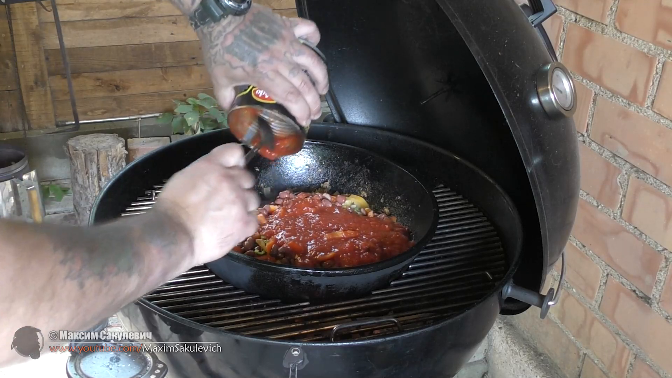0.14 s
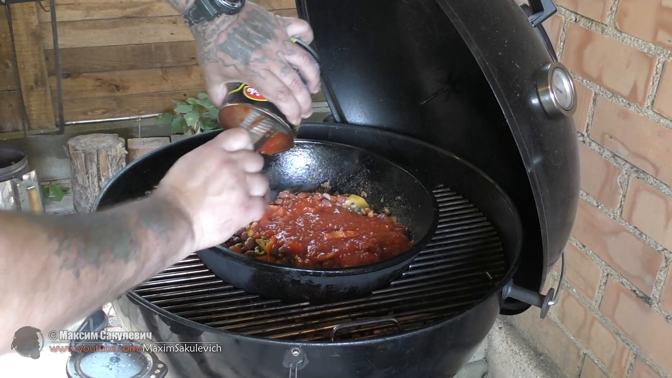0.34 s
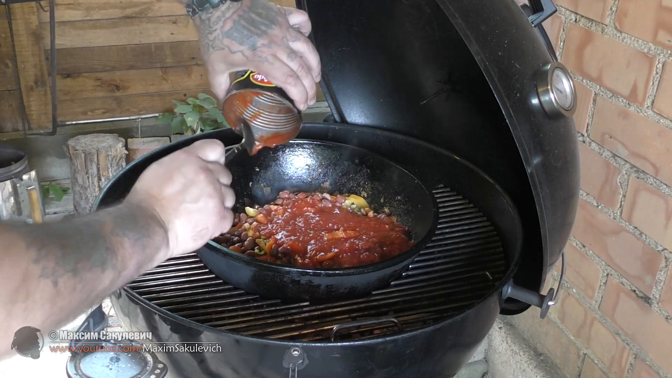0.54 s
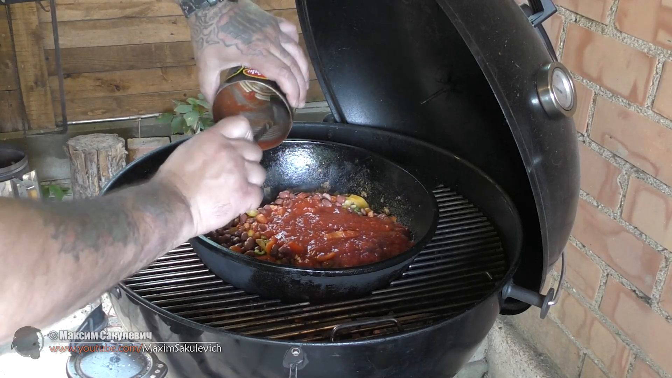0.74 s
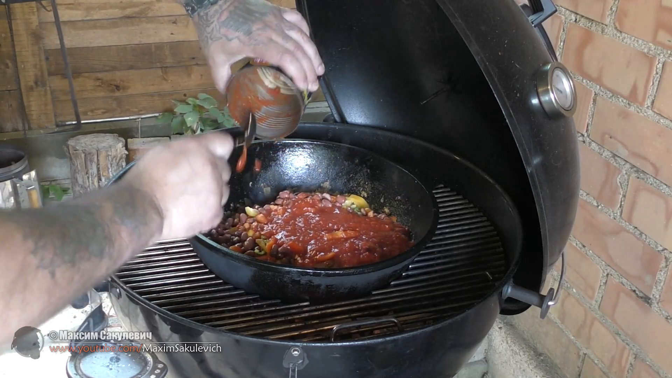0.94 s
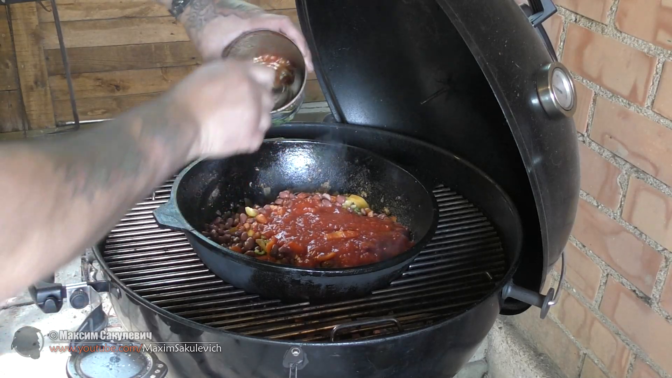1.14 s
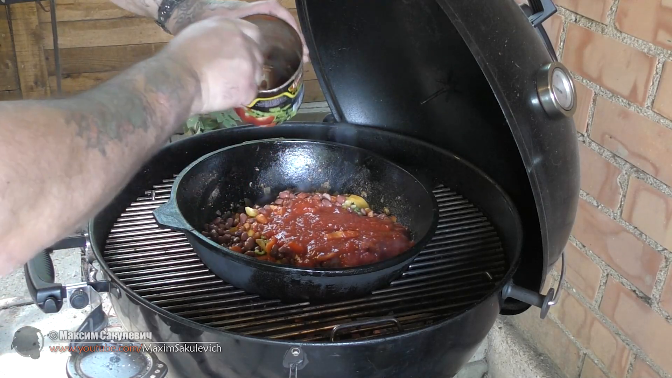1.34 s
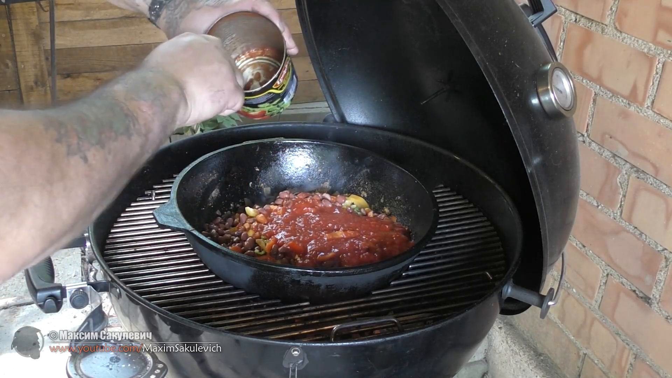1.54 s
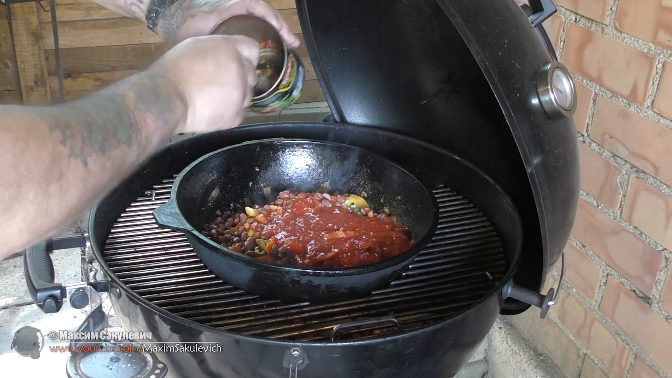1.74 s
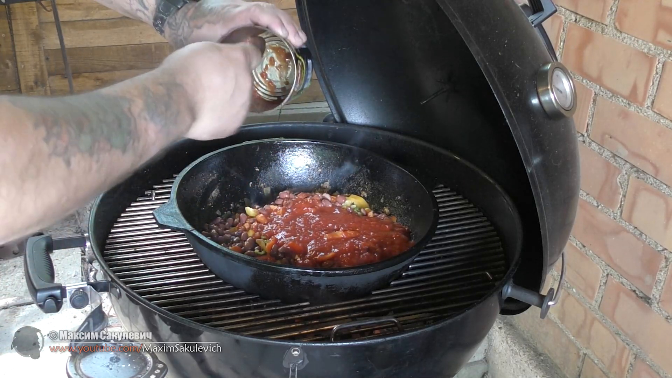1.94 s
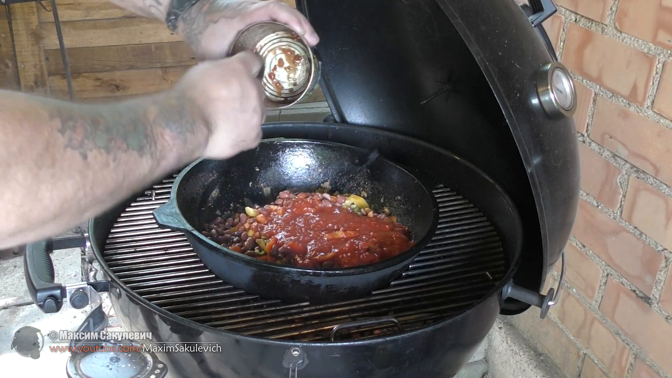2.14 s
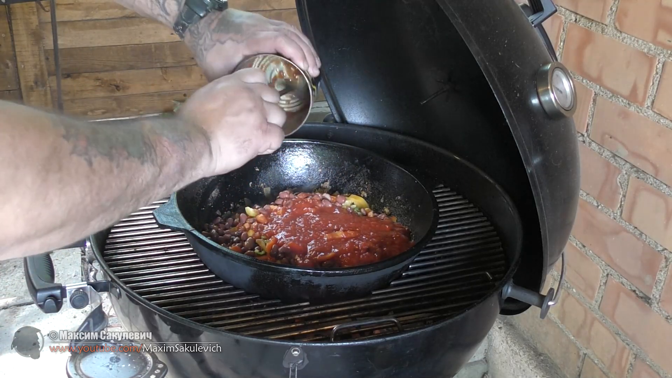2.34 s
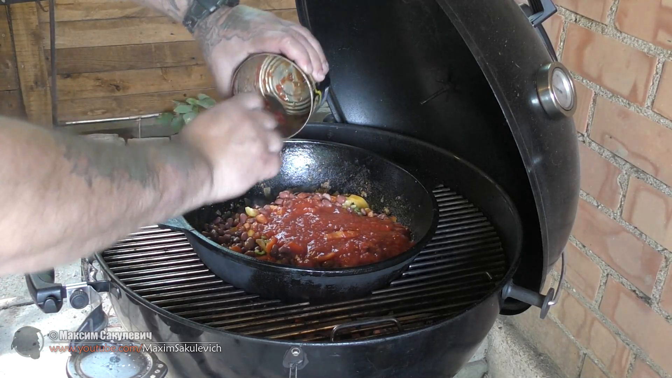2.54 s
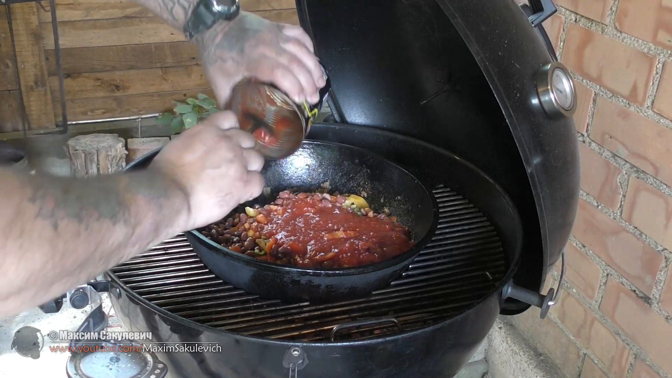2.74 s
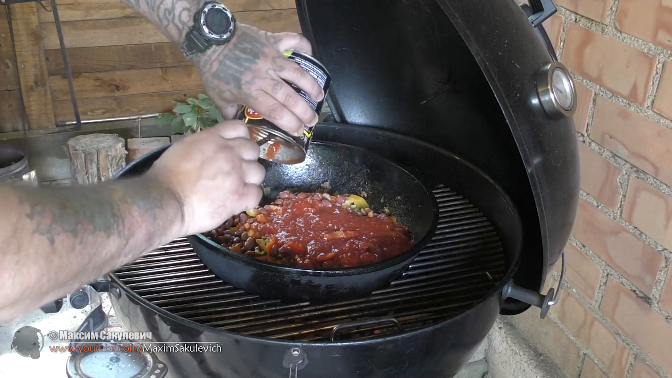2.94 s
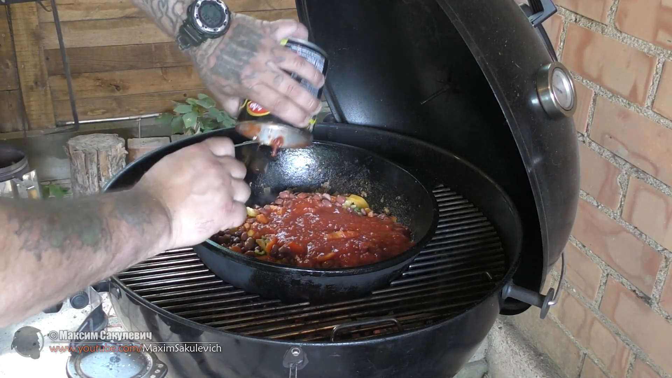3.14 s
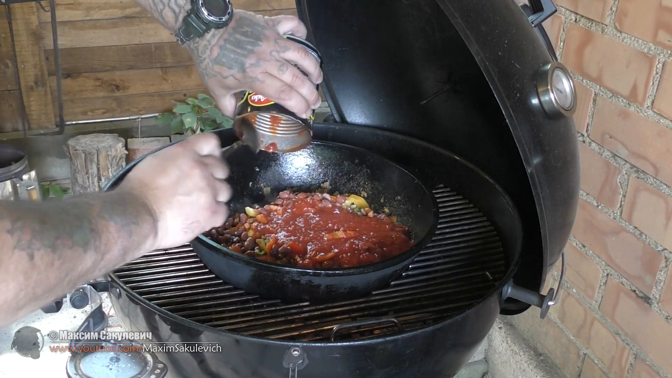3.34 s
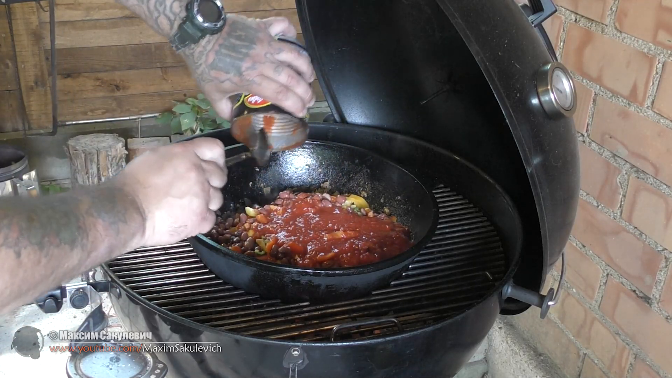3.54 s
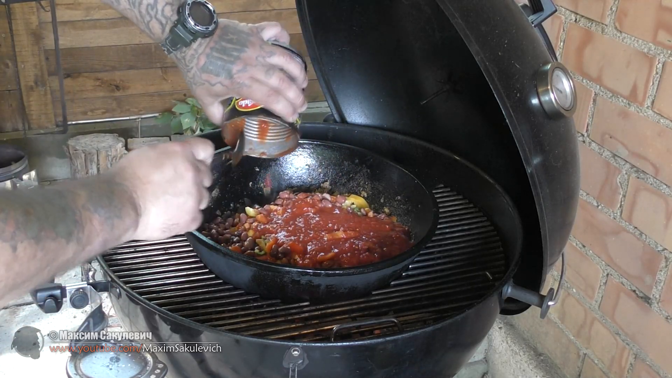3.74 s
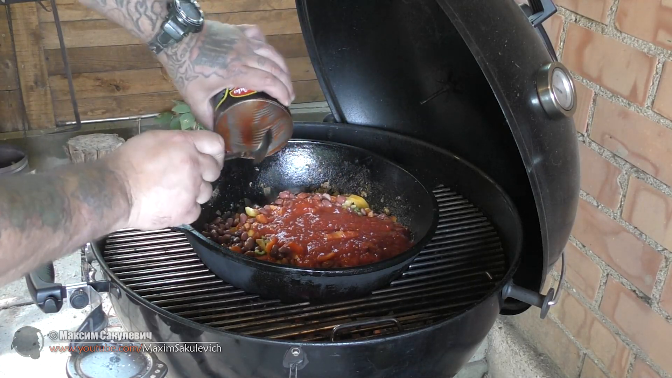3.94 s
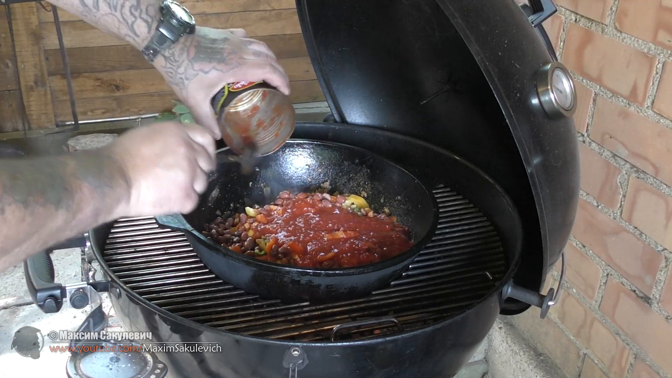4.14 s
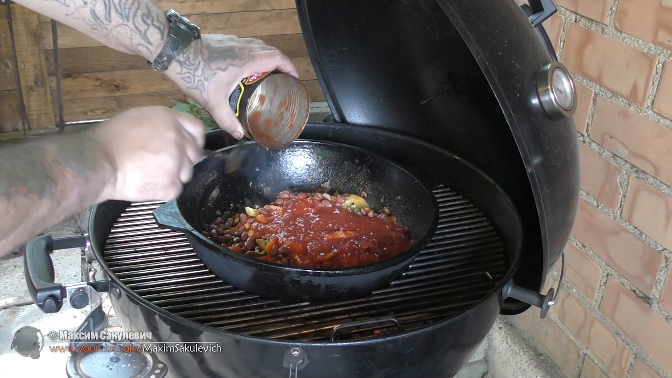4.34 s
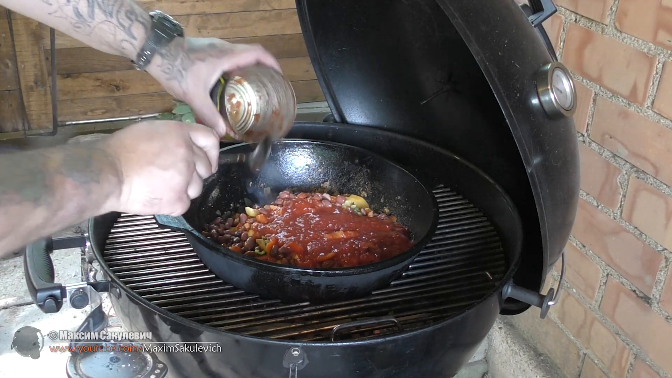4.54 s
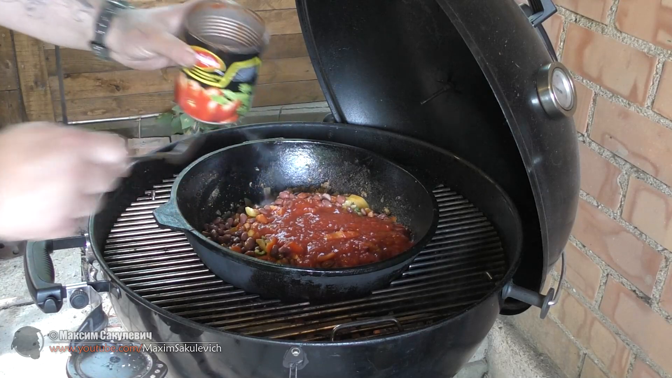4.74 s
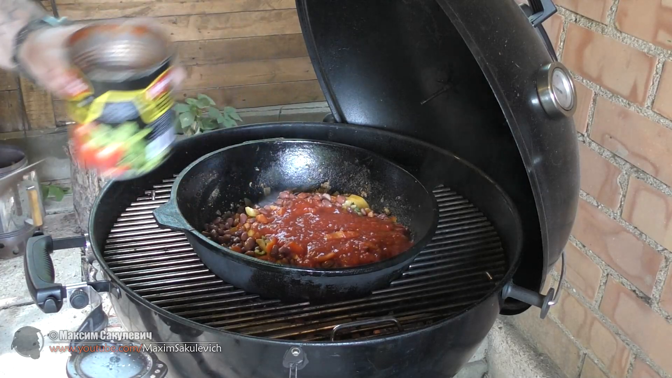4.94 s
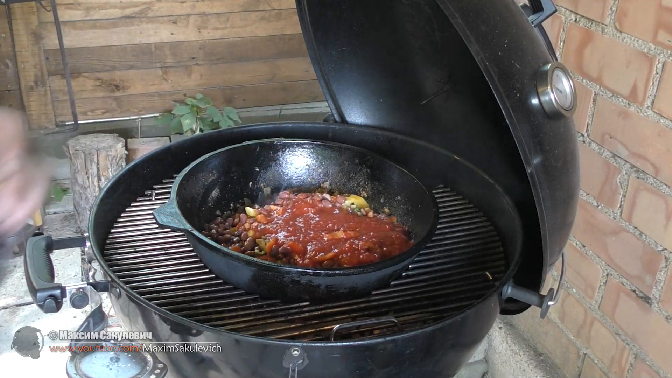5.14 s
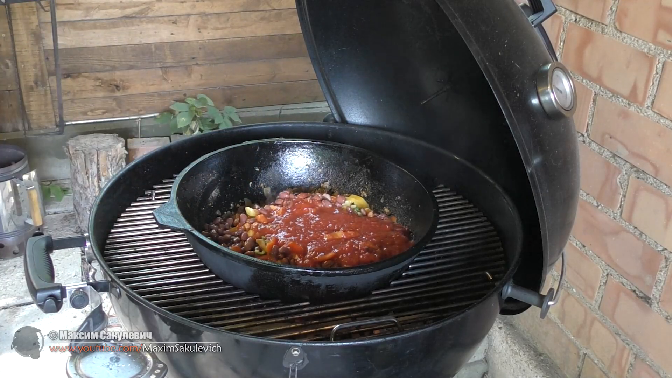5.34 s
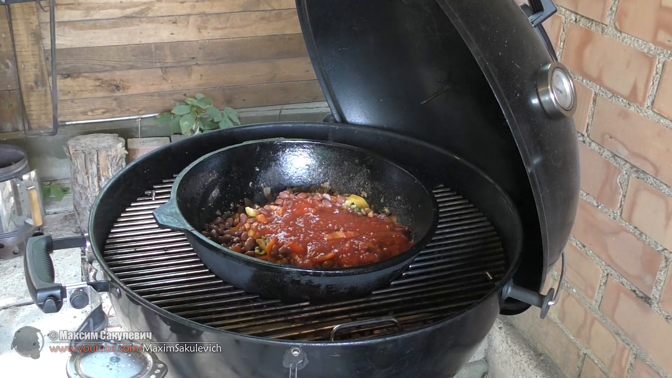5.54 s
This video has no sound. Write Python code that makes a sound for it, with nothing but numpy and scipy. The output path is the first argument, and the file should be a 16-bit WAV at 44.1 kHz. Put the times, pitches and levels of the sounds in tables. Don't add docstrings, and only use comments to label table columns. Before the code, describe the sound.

Spoon strokes scrape a ribbed tin can from the start: bright metallic clicks, brief gritty hisses and a short hollow can ring. The strokes come in uneven bursts, grow sharper near three seconds, and end at about 4.6 seconds. Pan sizzle and soft low wind stay underneath. Open yard, dry and close, almost mono, a slight dull reflection from a nearby wall.

```python
import sys
import numpy as np
from scipy import signal
from scipy.io import wavfile
from scipy.ndimage import uniform_filter1d

SR = 44100
rng = np.random.default_rng(int(sys.argv[2]) if len(sys.argv) > 2 else 0)


def boost_factor(decibels):
    exponent = np.asarray(decibels, float) / 20
    return 10 ** exponent


def store_pcm(level_fs):
    pcm = np.round(np.clip(level_fs, -1, 1) * 32767).astype(np.int16)
    wavfile.write(sys.argv[1], SR, np.atleast_2d(pcm).T)


N = 246298
CONTROL_STEP = 40

# t/s, wall peak level/dB, ping f/Hz, shell peak level/dB, favoured shell f/Hz
LANDINGS = [(0.0677, -26, 3690, -31.5, 489), (0.283, -24.5, 3640, -24, 527),
            (0.4307, -27.5, 2970, -30, 475), (0.7681, -19, 4110, -20.5, 589), (0.9687, -28, 3930, -70, 640),
            (1.3432, -21, 3050, -19.5, 698), (1.7507, -21, 3110, -24, 654), (2.1081, -21, 5800, -24, 660),
            (2.1404, -28, 2870, -22.5, 646), (2.2523, -25, 3220, -22, 630), (2.4461, -22, 4440, -37, 540),
            (2.5082, -18, 2876, -22, 656), (2.7215, -25.5, 4160, -20, 667),
            (2.8789, -27.5, 3580, -14.5, 517), (2.9883, -21.5, 3520, -22.5, 673),
            (3.0991, -12.5, 3235, -18, 490), (3.4183, -15.5, 5340, -20.5, 524),
            (3.6631, -15, 3640, -29.5, 760), (3.7793, -18.5, 5400, -24.5, 616),
            (4.1689, -18, 4990, -24, 642), (4.2283, -23, 4470, -59, 620), (4.4687, -27.5, 4230, -29.5, 680),
            (4.5072, -21, 3970, -25, 650), (4.607, -21.5, 5160, -26.5, 590)]
# start t/s, hold t/s, wall hiss level/dB, wall f/Hz, mid ring relative level/dB
DRAG_STROKES = [(0.104, 0.023, -34.5, 4050, -20.5), (0.201, 0.059, -28.5, 4360, -8.5),
                (0.433, 0.0071, -40, 3450, -9.5), (0.505, 0.11, -36, 5280, -13),
                (0.808, 0.052, -42.5, 4230, -19), (0.937, 0.015, -28, 4330, -15),
                (1.21, 0.095, -45, 5230, -12), (1.346, 0.21, -35, 3760, -10),
                (1.763, 0.017, -40.5, 3080, -6), (1.856, 0.019, -36, 4200, -10.5),
                (2.103, 0.028, -35.5, 5340, -8), (2.186, 0.11, -43, 4020, -8),
                (2.469, 0.016, -28, 6800, -15.5), (2.582, .03, -30.5, 4304, -6.5),
                (2.706, 0.086, -30.5, 6500, -12.5), (2.822, .05, -36, 5400, -6.5),
                (3.125, 0.01, -32.5, 3300, -10.5), (3.184, 0.033, -38, 5080, -8),
                (3.447, 0.013, -32, 5000, -3.5), (3.7, 0.026, -31, 4470, -13.5), (3.8, .05, -41, 5200, -9),
                (4.225, .065, -22, 5000, -24), (4.515, 0.021, -41, 4580, -2),
                (4.615, 0.0056, -31, 4810, -8)]


def rms_one(x):
    return x / np.sqrt(np.mean(x ** 2) + 1e-20)


def in_time(rows):
    s, *columns = np.transpose(rows)
    return [np.interp(np.arange(N) / SR, s, column) for column in columns]


def at_hz(points, hz):
    points = np.array(points)
    return np.interp(np.log(hz), np.log(points[:, 0]), points[:, 1])


def fine(coarse):
    return np.interp(np.arange(N) / CONTROL_STEP, np.arange(len(coarse)), coarse)


def drift(rate_hz, coarse=False):
    r = np.exp(-2 * np.pi * rate_hz * CONTROL_STEP / SR)
    white = rng.standard_normal(N // CONTROL_STEP + 2001)
    slow = rms_one(signal.lfilter([1], [1, -2 * r, r * r], white)[2000:])
    return slow if coarse else fine(slow)


def passband(x, low_hz, high_hz):
    return signal.sosfilt(signal.butter(3, [low_hz, high_hz], "band", fs=SR, output="sos"), x)


def yard():
    # f/Hz, level/dB per Hz
    spectrum = [(12, -35), (20, 3.5), (49, 4), (66, -0.5), (118, -29.5), (150, -18), (203, -16), (323, -39),
                (486, -26.5), (711, -32), (1330, -33.5), (2000, -40.5), (6830, -38.5), (9480, -46.5),
                (13500, -101)]
    # t/s, wind level/dB, wash offset level/dB, sizzle offset level/dB
    breeze = [
        (0.0, -45.5, 8, 16.5),
        (1.1, -49.5, 8, 13.5),
        (2.3, -49.5, 8.5, 17),
        (3.91, -54, 4.5, 11.5),
        (4.62, -48, 7, 12.5),
        (5.58, -51.5, 2.5, 3.5),
    ]
    wind_db, murmur_db, sizzle_db = in_time(breeze)
    out = 0
    edges = 22 * 2 ** np.arange(0, 9.4, 1 / 3)
    white = rng.standard_normal((2, N))
    for k, (low, high) in enumerate(zip(edges, edges[1:])):
        band = signal.sosfilt(signal.butter(2, [low, high], "band", fs=SR, output="sos"), white[k % 2])
        hz = np.sqrt(low * high)
        if hz < 120:
            swell_db = 0.87 * (wind_db - wind_db.mean())
        else:
            swell_db = murmur_db if hz < 2800 else sizzle_db
        out = out + band * boost_factor(at_hz(spectrum, hz) + swell_db + 2.03 * drift(8.6))
    return boost_factor(-43.5) * rms_one(out)


def unlike_rumble():
    rumble = passband(rng.standard_normal(N), low_hz=25, high_hz=100)
    return boost_factor(-69) * rms_one(rumble) * [[1], [-1]]


def contacts():
    # first t/s, last t/s, wall peak level/dB, shell peak level/dB,
    # favoured shell f/Hz
    rib_runs = [(0.199, 0.246, -23, -26, 580), (0.5755, 0.5755, -35, -43, 591),
                (0.923, 0.939, -29, -30, 680), (1.3925, 1.3925, -39, -27, 680),
                (1.457, 1.457, -40, -35, 660), (1.494, 1.537, -33, -24, 670), (1.852, 1.869, -22, -21, 590),
                (1.905, 1.918, -38, -23, 670), (2.18, 2.216, -42, -18, 630), (2.282, 2.282, -45, -37, 610),
                (2.3428, 2.355, -21, -20, 620), (2.397, 2.397, -50, -30, 610),
                (2.597, 2.612, -18, -16, 620), (2.745, 2.789, -31, -19, 620), (2.816, 2.828, -19, -20, 600),
                (2.841, 2.855, -19, -25, 560), (3.042, 3.042, -48, -31, 650), (3.132, 3.132, -34, -34, 540),
                (3.165, 3.2, -18.5, -24, 570), (3.456, 3.456, -41, -28, 590), (3.715, 3.715, -36, -31, 650),
                (4.205, 4.205, -38, -29, 610), (4.259, 4.293, -33, -24, 630), (4.527, 4.527, -40, -28, 620)]
    # t/s, peak level/dB
    ticks = [(0.017, -46), (0.408, -38), (0.4633, -35), (1.226, -40.5), (1.42, -32), (1.742, -23),
             (1.914, -31.5), (2.0732, -33), (2.232, -37), (3.9609, -46), (4.433, -54), (5.1495, -48.5)]
    rib_s = 0.018
    middle_s = [s + hold / 2 for s, hold, *_ in DRAG_STROKES]
    pitch_hz, flex_db = np.array(DRAG_STROKES)[:, 3], np.array(DRAG_STROKES)[:, 4]
    rows = list(LANDINGS)
    for first, last, wall_db, shell_db, shell_hz in rib_runs:
        for s in np.linspace(first, last, round((last - first) / rib_s) + 1):
            rows.append((s, wall_db, 0.85 * np.interp(s, middle_s, pitch_hz), shell_db, shell_hz))
    for s, db in ticks:
        rows.append((s, db, np.interp(s, middle_s, pitch_hz), db - 36, 600))
    s, wall_db, low_hz, shell_db, shell_hz = np.transpose(rows)
    luck = rng.standard_normal((len(rows), 2))
    low_hz[len(LANDINGS):] *= np.exp(0.0848 * luck[len(LANDINGS):, 0])
    high_hz = 1.55 * low_hz * np.exp(0.25 * luck[:, 1])
    ring_db = 1.78 * np.interp(s, middle_s, flex_db)
    return np.transpose([s, wall_db, low_hz, high_hz, ring_db, shell_db, shell_hz])


def stroke_curves():
    rise_db_s, fall_db_s = 508, 426
    skid_db, skid_db_s = -10.5, 405
    skid_flex_db = -14.5
    t = np.arange(0, N, CONTROL_STEP) / SR
    hiss, flex = np.full(len(t), 1e-9), np.full(len(t), 1e-9)
    for s, hold, db, _, rel_db in DRAG_STROKES:
        rise_db = rise_db_s * np.clip(s - t, 0, 0.2)
        fall_db = fall_db_s * np.clip(t - s - hold, 0, 0.2)
        power = boost_factor(2 * (db - rise_db - fall_db))
        hiss, flex = hiss + power, flex + power * boost_factor(2 * rel_db)
    for s, db, *_ in LANDINGS:
        skid = (t > s) * boost_factor(2 * (db + skid_db - skid_db_s * np.clip(t - s, 0, 0.2)))
        hiss, flex = hiss + skid, flex + skid * boost_factor(2 * skid_flex_db)
    pitch_hz, = in_time([(s + hold / 2, hz) for s, hold, _, hz, _ in DRAG_STROKES])
    return fine(10 * np.log10(hiss)), pitch_hz, fine(10 * np.log10(flex))


def ring(force, hz, t60):
    r, w = boost_factor(-60 / (t60 * SR)), 2 * np.pi * hz / SR
    return signal.lfilter([0, np.sin(w)], [1, -2 * r * np.cos(w), r * r], force + 1e-18)


def steady_gain(t60):
    return np.sqrt(4 * 3 * np.log(10) / (t60 * SR))


def clicks(events, level_db):
    out = np.zeros(N)
    np.add.at(out, (np.array(events)[:, 0] * SR).astype(int) - 30, boost_factor(level_db))
    return out


def blows(knocks, level_db, chatter_s):
    length = round(0.03 * SR)
    out = np.zeros(N + length)
    t = np.arange(length) / SR
    shape = (1 - np.exp(-t / 0.00094)) * np.exp(-t / chatter_s)
    bursts = rng.standard_normal((len(knocks), length)) * shape / np.sqrt(np.sum(shape ** 2))
    for (s, *_), burst, gain in zip(knocks, bursts, boost_factor(level_db)):
        out[round(s * SR) - 40:][:length] += gain * burst
    return out[:N]


def friction(per_s, spread_db, rib_db):
    sizes = boost_factor(spread_db * np.minimum(rng.exponential(1, N), 5)) * rng.choice([-1, 1], N)
    slips = sizes * (rng.random(N) < per_s / SR)
    return rms_one(slips * boost_factor(rib_db * drift(144)))


def nearness(hz, centre_hz, width):
    return np.exp(-(np.log(hz / centre_hz) / width) ** 2)


def wall(knocks, hiss_db, pitch_hz, count=64):
    # f/Hz, level/dB per Hz
    wall_spectrum = [(1120, -64), (1900, -39), (2190, -6.5), (2520, -15.5), (2860, -3.5), (4080, -2),
                     (5420, -2), (9050, -5), (10800, -21.5), (12500, -27), (16200, -73), (22000, -120)]
    out = np.zeros(N)
    rubs = [boost_factor(hiss_db - 5.5) * friction(per_s=6300, spread_db=2.5, rib_db=5.0) for patch in range(3)]
    pitches = np.linspace(1900, 12500, count) + rng.uniform(-70.0, 57, count)
    lasting = rng.uniform(0.49, 1.95, count)
    for k, (hz, stretch) in enumerate(zip(pitches, lasting)):
        t60 = 0.021 * stretch * (hz / 5000) ** -0.4
        near = nearness(hz, knocks[:, 2], 0.13) + 0.66 * nearness(hz, knocks[:, 3], 0.086)
        hit_db = knocks[:, 1] - 12 + 8.96 * near + rng.normal(0, 2.6, len(knocks))
        wander_db = 3.5 * drift(15, coarse=True)
        focus_db = 11 * nearness(hz, pitch_hz[::CONTROL_STEP], 0.3)
        rub = rubs[k % 3] * steady_gain(t60) * fine(boost_factor(-21.0 + focus_db + wander_db))
        force = blows(knocks, hit_db, chatter_s=0.0059) + rub
        out += (-1) ** k * boost_factor(at_hz(wall_spectrum, hz)) * ring(force, hz, t60)
    return out


def pings(knocks, level_db, t60):
    t = np.arange(round(0.15 * SR)) / SR
    onset = np.minimum(t / 0.003, 1)
    out = np.zeros(N + len(t))
    for s, peak_db, low_hz, high_hz, *_ in knocks:
        for hz in (low_hz, np.sqrt(low_hz * high_hz), high_hz):
            decay_db = -60 * t / (t60 * 4000 / hz)
            tone = np.sin(2 * np.pi * hz * t) * onset
            out[round(s * SR):][:len(t)] += boost_factor(peak_db + level_db + decay_db) * tone
    return out[:N]


def shell(knocks, ring_db):
    # f/Hz, level/dB, t60/s
    hum_families = [
        [(440, -2.5, 0.06), (489.6, 4, 0.086), (511.2, -6.5, 0.19)],
        [(597.6, -7.5, 0.3), (606, 5, 0.077), (643, -1, 0.1)],
        [(675, -6.5, 0.24), (711.5, 0.5, 0.25), (745.1, 5.5, 0.12)],
    ]
    # f/Hz, level/dB, t60/s
    ring_modes = [(1075, -1.5, 0.086), (1127, -1.5, 0.1), (1131, 0, 0.033), (1415, -11.5, 0.12),
                  (1490, -22.5, 0.056), (1900, -5, 0.038), (2127, 3.5, 0.014), (2270, -6, 0.18),
                  (2430, -9, 0.034), (2756, -18.5, 0.11)]
    hum, mid = np.zeros(N), np.zeros(N)
    grip_db = 2.5 * drift(43.6)
    drag = boost_factor(ring_db + grip_db) * rng.standard_normal((3, N))
    for k, (hz, level_db, t60) in enumerate(sum(hum_families, [])):
        off_db = np.minimum((np.log(hz / knocks[:, 6]) / 0.058) ** 2, 18)
        luck_db = rng.normal(0, 4.5, len(knocks))
        rub = boost_factor(-7.5) * drag[k % 3] * steady_gain(t60)
        force = clicks(knocks, knocks[:, 5] - off_db - 3.5 + luck_db) + rub
        hum += (-1) ** ((k + 1) // 2) * boost_factor(level_db) * ring(force, hz, t60)
    for k, (hz, level_db, t60) in enumerate(ring_modes):
        luck_db = rng.normal(0, 4, len(knocks))
        rub = boost_factor(-10) * drag[k % 3] * steady_gain(t60)
        force = clicks(knocks, knocks[:, 1] + knocks[:, 4] - 3 + luck_db) + rub
        mid += (-1) ** k * boost_factor(level_db) * ring(force, hz, t60)
    return passband(hum, low_hz=364, high_hz=810) + passband(mid, low_hz=860, high_hz=2700)


def thud():
    # t/s, peak level/dB
    thumps = [(0.068, -34.5), (0.199, -34), (0.281, -33), (0.433, -28.5), (0.772, -47), (1.343, -32.5),
              (1.753, -34.5), (1.864, -32.5), (2.105, -38), (2.342, -46), (2.447, -33.5), (2.506, -36),
              (2.61, -37), (2.727, -39), (2.816, -30.5), (2.856, -35.5), (2.882, -37), (3.102, -23),
              (3.165, -29), (3.201, -35), (3.417, -36), (3.457, -28.5), (3.781, -38), (4.474, -47)]
    # f/Hz, level/dB, t60/s
    floor_modes = [(178, -51, 0.15), (207, -3, 0.16), (254.8, 3.5, 0.092), (389, -22, 0.21)]
    push_db = np.array(thumps)[:, 1] - 6
    out = np.zeros(N)
    for hz, mode_db, t60 in floor_modes:
        luck_db = rng.normal(0, 1.4, len(thumps))
        out += ring(clicks(thumps, push_db + mode_db + luck_db), hz, t60)
    return out


def brick_echoes(x):
    out = np.zeros(N)
    for lag_s, level_db in [(.0047, -40.5), (.0093, -28.5), (.017, -17.5), (.031, -54), (.052, -52)]:
        lag = round(lag_s * SR)
        out[lag:] += boost_factor(level_db) * x[:-lag]
    return signal.lfilter([0.5], [1, -0.5], out)


def scene():
    knocks = contacts()
    hiss_db, pitch_hz, ring_db = stroke_curves()
    can = shell(knocks, ring_db) + pings(knocks, level_db=-12.5, t60=0.095)
    can = can + wall(knocks, hiss_db, pitch_hz) + thud()
    return can + brick_echoes(can) + yard() + unlike_rumble()


def limiter(x, top_db, release_db_s):
    slope = release_db_s * np.arange(N) / SR
    over = np.maximum(20 * np.log10(np.abs(x).max(axis=0) + 1e-9) - top_db, 0)
    held = np.maximum(np.maximum.accumulate(over + slope) - slope, 0)
    return x * boost_factor(-0.9 * uniform_filter1d(held, size=48, origin=-20))


def low_pass(x):
    return signal.sosfilt(signal.butter(12, 13660, fs=SR, output="sos"), x)


def record(dry):
    hole_s = 3.8155, 3.8235
    start, end = hole_s
    hole_times = [start - 0.0005, start, end, end + 0.006, end + 0.06]
    hole = np.interp(np.arange(N) / SR, hole_times, [1, 0.05, 0.05, 0.45, 1])
    rumble = signal.sosfiltfilt(signal.butter(2, 250, fs=SR, output="sos"), dry)
    x = limiter(rumble + hole * (dry - rumble), top_db=-10.5, release_db_s=250)
    x = signal.sosfilt(signal.butter(6, 34, "high", fs=SR, output="sos"), x)
    x = signal.sosfilt(signal.butter(8, 10800, fs=SR, output="sos"), x)
    return low_pass(x)


dry = scene()
out = record(dry)
store_pcm(out)
```